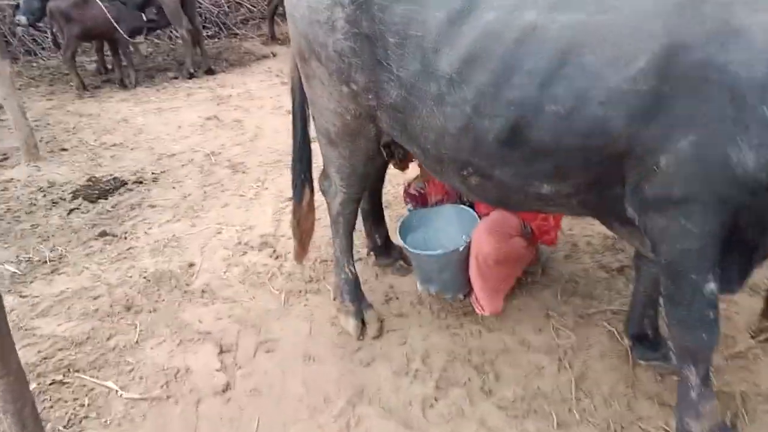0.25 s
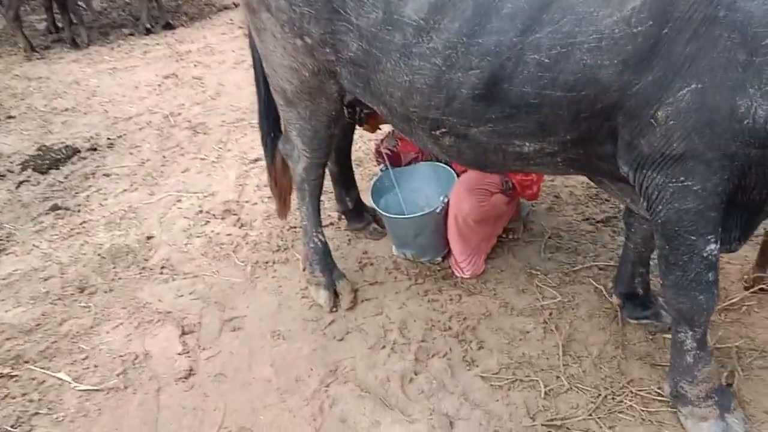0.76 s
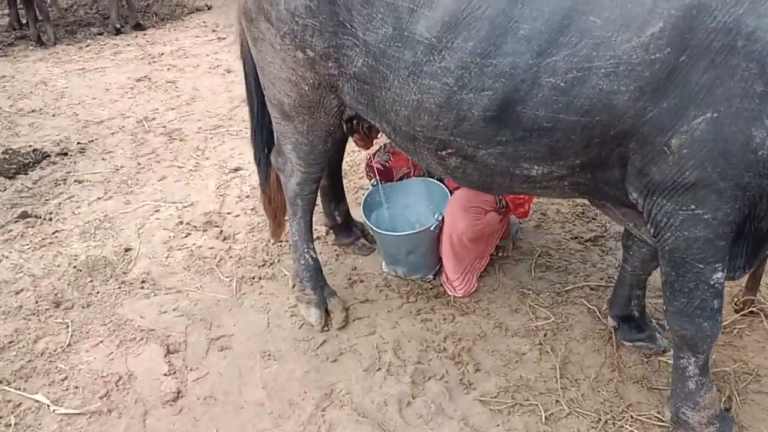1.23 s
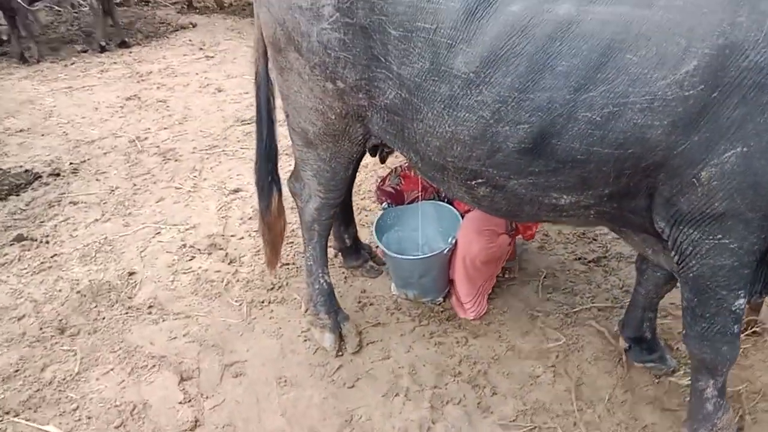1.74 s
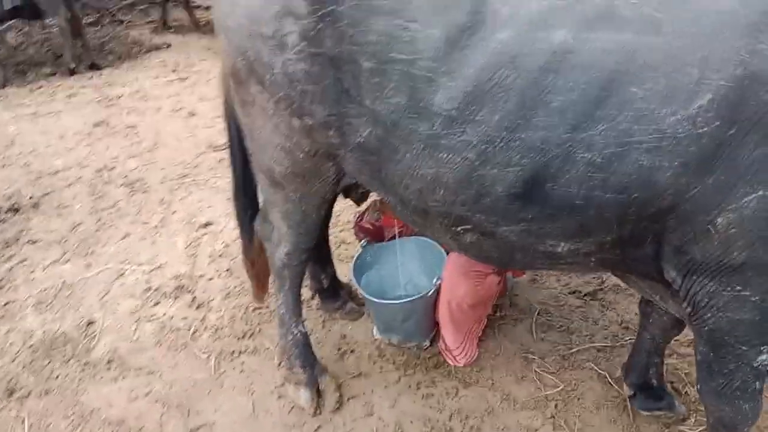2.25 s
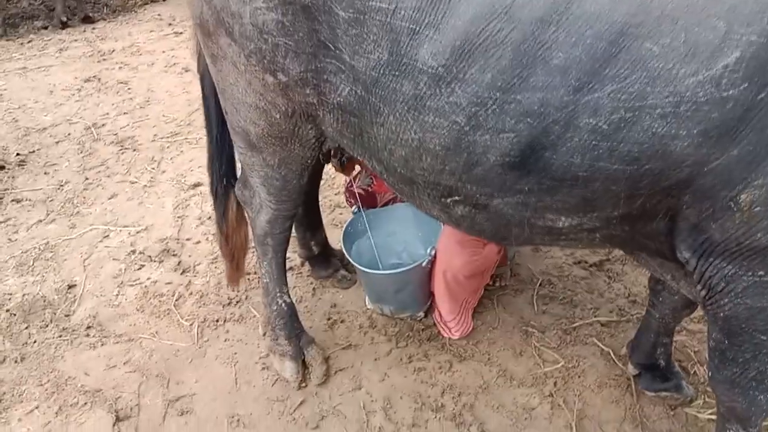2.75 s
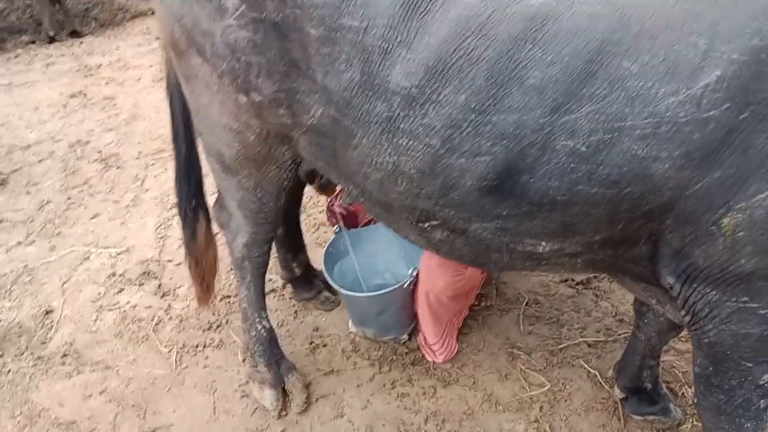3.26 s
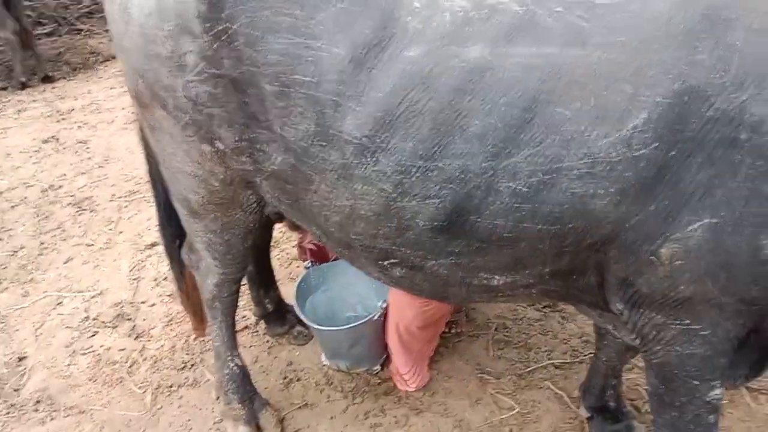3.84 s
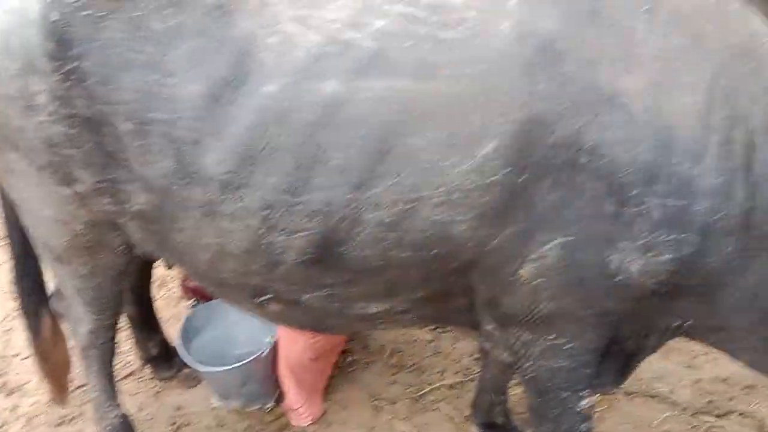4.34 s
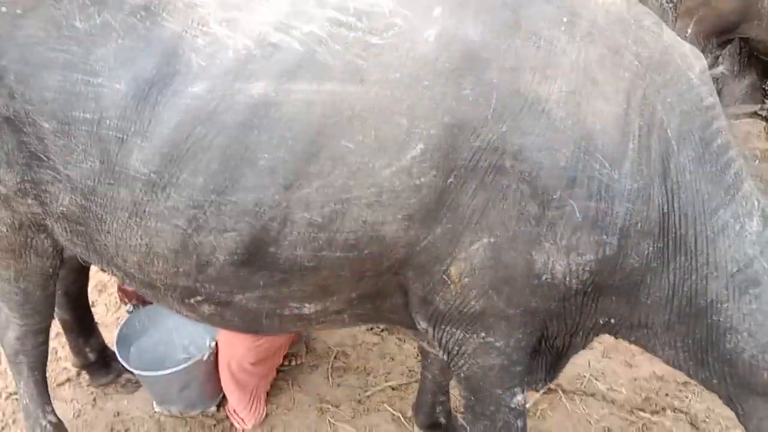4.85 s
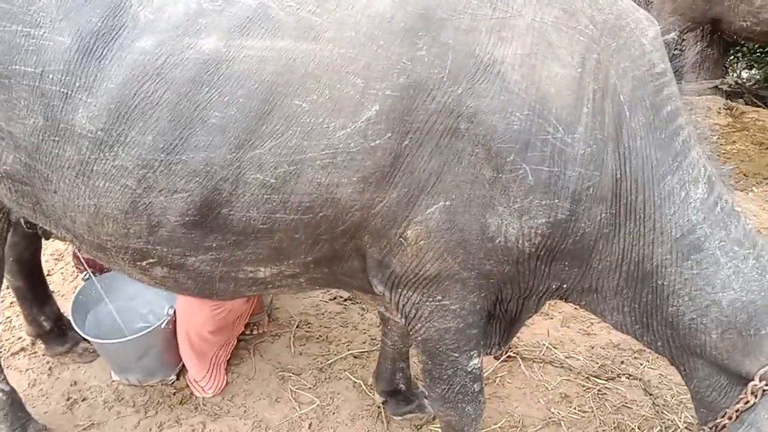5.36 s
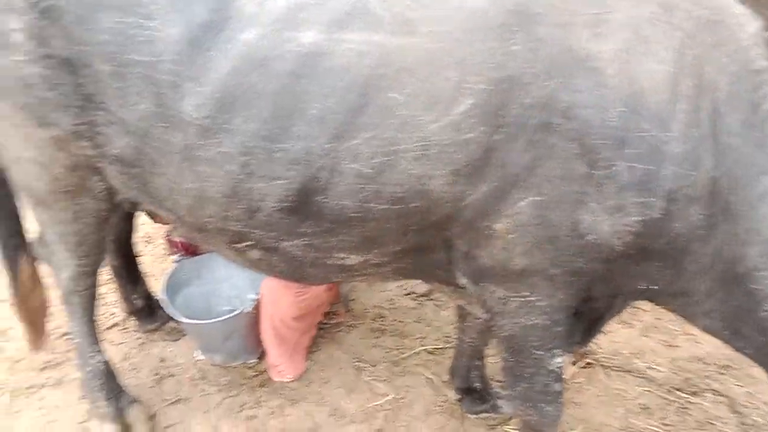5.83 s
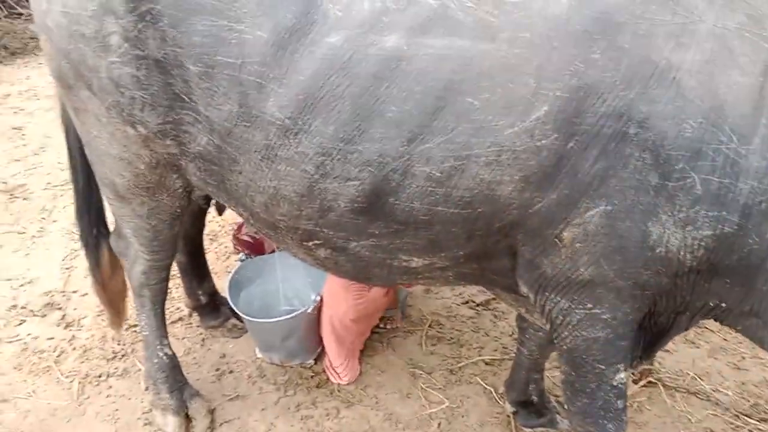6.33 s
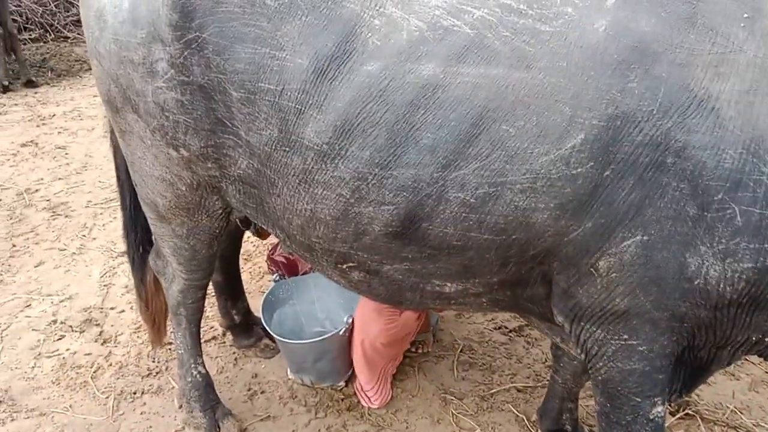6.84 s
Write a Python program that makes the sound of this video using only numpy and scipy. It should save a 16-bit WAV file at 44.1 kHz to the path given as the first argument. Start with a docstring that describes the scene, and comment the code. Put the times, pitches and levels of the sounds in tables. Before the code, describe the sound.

A buffalo is milked by hand outdoors: short wet squirts fizz and gurgle in a metal pail, sometimes pinging its wall, with soft thuds.

```python
"""Jets of milk hiss into the froth of a steel bucket, about three a second, as a buffalo is milked by hand outdoors.
One microphone moves slowly round the animal: noise shaped by each squeeze makes splash and fizz, while decaying
chirps make bubbles and a resonance that falls in pitch is the pit each jet digs.
Drops spatter, noise bursts and ringing modes are blows on the bare wall, and low tones thud in the dirt yard.
Faint outdoor air and the hiss of settling froth, both from one coloured noise, lie behind it all."""
import sys
import numpy as np
from scipy import signal
from scipy.io import wavfile
from scipy.ndimage import uniform_filter1d

SR = 44100
rng = np.random.default_rng(int(sys.argv[2]) if len(sys.argv) > 2 else 0)


def write(x):
    x = np.atleast_2d(x).T
    wavfile.write(sys.argv[1], SR, np.round(np.clip(x, -1, 1) * 32767).astype(np.int16))


N = 312669


def gain_of(db):
    """Decibels to amplitude."""
    return 10 ** (np.asarray(db) / 20)


def evened(x):
    """Scales to an rms of one."""
    return x / np.sqrt(np.mean(x ** 2) + 1e-20)


def steadied(x, size=1500):
    """Holds the running rms near one and keeps the fine grain; size is in samples."""
    power = uniform_filter1d(uniform_filter1d(x ** 2, size), size)
    return x / np.sqrt(power + 1e-12)


def add(mix, s, sound):
    """Mixes a sound in at time s."""
    part = mix[max(round(s * SR), 0):][:len(sound)]
    part += sound[:len(part)]


def coloured(x, points):
    """Causal minimum-phase filter with the given spectrum."""
    hz, db = np.transpose(points)
    bin_hz = abs(np.fft.fftfreq(4096, 1 / SR)) + 1
    log_gain = np.log(gain_of(np.interp(np.log(bin_hz), np.log(hz), db)))
    taps = np.fft.ifft(np.exp(np.conj(signal.hilbert(log_gain)))).real[:2048]
    return signal.oaconvolve(x, taps)[:len(x)]


def high_pass(x, hz, order=4):
    """Weakens what lies below hz."""
    return signal.sosfilt(signal.butter(order, hz, "high", fs=SR, output="sos"), x)


def resonate(x, hz, width):
    """A resonance of gain one that can follow a pitch curve: shift to 0 Hz, smooth, shift back."""
    turn = np.exp(2j * np.pi * np.cumsum(hz * np.ones(len(x))) / SR)
    r = np.exp(-np.pi * width / SR)
    smooth = signal.lfilter([(1 - r) ** 2], [1, -2 * r, r * r], x / turn)
    return 2 * (turn * smooth).real


def churned(x, patchy_db, size=1024):
    """Lifts and lowers changing patches of the spectrum; a smaller size makes them quicker and wider."""
    z = signal.stft(x, SR, nperseg=size, noverlap=size * 3 // 4)[2]
    patches = uniform_filter1d(rng.standard_normal(z.shape), size=4, axis=0)
    patches = evened(uniform_filter1d(patches, size=8, axis=1))
    return signal.istft(z * gain_of(patchy_db * patches), SR, nperseg=size, noverlap=size * 3 // 4)[1][:N]


# Colour of the background: faint outdoor air and the hiss of settling froth.
# Each row: frequency in Hz, level in dB per Hz.
BACKGROUND_COLOUR = [(25, -59), (60, -2.5), (130, 2), (300, -1.5), (450, -1.5), (650, 4.5), (900, 25.5),
                     (1500, -23.5), (2400, -15), (3200, 2), (4400, 11), (5300, 20.5), (7500, 0), (9300, -7),
                     (15500, -4)]


def background():
    """Faint outdoor air and the hiss of settling froth: noise whose spectrum changes in patches."""
    hiss = coloured(churned(rng.standard_normal(N), patchy_db=2.5), BACKGROUND_COLOUR)
    return gain_of(-58.5) * evened(hiss)


# Dull thuds in the yard and the bucket.
# Each row: start in seconds, level in dB, pitch in Hz, time to die by 60 dB in seconds.
THUD_EVENTS = [(2.163, -56, 78, 0.075), (2.888, -49.5, 138, 0.13), (3.157, -53, 170, 0.089),
               (3.182, -40.5, 213, 0.079), (3.217, -40, 124, 0.043), (3.398, -58, 230, 0.13),
               (3.439, -58, 125, .08), (3.54, -42, 245, 0.064), (3.6, -47, 208, 0.095),
               (3.679, -47, 267, 0.14), (3.709, -23.5, 136, 0.042), (3.727, -41.5, 187, 0.088),
               (3.774, -19, 382, 0.0076), (3.776, -37, 105, .07), (3.787, -50, 77, 0.19),
               (4.163, -55, 116, 0.13), (5.547, -35, 494, 0.077), (5.621, -53.5, 117, 0.16)]
THUD_RISE_SHARE = 0.088  # soft earth yields: the rise takes this share of a thud's dying time


def thuds():
    """Soft earth gives a low push that dies away, with a scuff of dirt."""
    out, t = np.zeros(N), np.arange(SR // 3) / SR
    for s, db, hz, t60 in THUD_EVENTS:
        band = signal.butter(2, [hz / 3, hz * 3.2], "band", fs=SR, output="sos")
        scuff = evened(signal.sosfilt(band, rng.standard_normal(len(t))))
        push = np.sin(2 * np.pi * hz * t)
        rise = np.minimum(t / (THUD_RISE_SHARE * t60), 1)
        add(out, s, rise * gain_of(db - 60 * t / t60) * (push + gain_of(-7.0) * scuff))
    return high_pass(out, hz=52)


# Modes of the steel bucket. Each row: frequency in Hz, level in dB, time to die by 60 dB in seconds.
BUCKET_MODES = [(630, -25, .3), (845, -19, .25), (919, -8, .22), (1085, -17, .3), (1233, -13, .24),
                (1610, -14, .19), (1863, -17.5, .21), (1965, -15, .19), (2331, -19, .25), (2390, -16, .11),
                (2686, -13, .24), (3020, -13, .19), (3150, -13, .23), (3554, 1, .14), (3880, -10, .07),
                (4064, -15, .1), (4200, -20, .14), (6342, -19, .12), (6982, -17, .1), (7187, -18, .09)]


def ring():
    """The bucket's answer to one tap: a sum of dying modes."""
    t = np.arange(SR // 4) / SR
    return sum(gain_of(db - 60 * t / t60) * np.sin(2 * np.pi * (hz * t + rng.random()))
               for hz, db, t60 in BUCKET_MODES)


def in_bucket(x, ring_db):
    """A sound plus the ringing that it stirs up; the jet wanders, so the modes come and go."""
    answer = ring()
    ringing = signal.oaconvolve(x, answer / np.linalg.norm(answer))[:N]
    return x + gain_of(ring_db) * churned(ringing, patchy_db=5)


# The jet plays on the bare wall and keeps its nearest modes ringing.
# Each row: start in seconds, length in seconds, favoured frequency in Hz, level in dB.
WALL_SPRAY_EVENTS = [(0.448, 0.094, 900, -52.5), (1.076, 0.14, 936, -43), (2.992, 0.0263, 960, -49),
                     (3.108, 0.092, 860, -44.5), (3.172, 0.015, 915, -35.5), (3.762, 0.087, 993, -41),
                     (4.349, 0.0077, 3420, -38), (4.342, 0.096, 644, -50.5), (4.733, 0.15, 1246, -44.5),
                     (5.563, 0.11, 863, -42.5), (5.944, 0.077, 947, -38.5), (5.946, 0.015, 3590, -31),
                     (5.947, 0.31, 1095, -48.5), (6.23, .013, 3580, -42), (6.302, 0.045, 1060, -65),
                     (6.353, 0.049, 990, -50)]


def wall_sprays():
    """A steady patter on bare steel drives a few of its modes, which ones depending on the spot."""
    out, answer = np.zeros(N), ring()
    for s, length, hz, db in WALL_SPRAY_EVENTS:
        n = round(length * SR)
        patter = resonate(rng.standard_normal(SR), hz, width=113)
        # skip the build-up, so that the modes already ring
        ringing = steadied(signal.oaconvolve(patter, answer))[len(answer):][:n]
        add(out, s, gain_of(db) * ringing * signal.windows.tukey(n, .3))
    return out


# The jet strikes the wall. Each row: start in seconds, level in dB before the trim in strikes(),
# treble in dB against the crack, time to die by 60 dB in seconds, wall ring in dB against the crack.
WALL_STRIKES = [(0.201, -37, 28, 0.055, -23), (0.743, -33.5, 12, .05, -18), (1.0819, -23, 6, 0.03, -5.5),
                (1.2515, -31, 13, 0.026, -23), (1.314, -25, -7, 0.026, -18), (1.719, -33, 14, 0.026, -22),
                (1.744, -20, -13, 0.066, -29), (1.757, -13, -12, 0.034, -25), (1.766, -13, -16, .03, -27),
                (1.805, -15, -17, 0.037, -30), (1.908, -27, 16, .025, -24), (2.055, -18.5, -5, 0.042, -17),
                (2.322, -38, 16, 0.026, -18), (2.362, -30, 14, .025, -22), (2.729, -29.5, 19, 0.021, -22),
                (2.766, -13.5, -9, 0.083, -27), (2.777, -19, 0, 0.091, -17), (2.8, -24, 16, 0.021, -17),
                (2.839, -25, 12, 0.023, -22), (2.89, -28, 15, 0.021, -28), (3.178, -29, 14, 0.028, -14),
                (3.243, -23.5, 8, 0.03, -13), (3.541, -17, -16, 0.038, -30), (3.673, -26, -1, 0.046, -7),
                (3.729, -10.5, -25, 0.031, -25), (4.218, -17, -20, 0.03, -16), (4.348, -19, -1, 0.046, -1),
                (4.446, -26, 6.5, 0.072, -21), (4.858, -18.5, 5.5, 0.02, -19),
                (5.1387, -18.5, -2, 0.086, -5), (5.5478, -9, 5, 0.054, 0), (5.703, -17, -26, 0.087, -9),
                (5.726, -17.5, -20, .06, -11), (5.9355, -11.5, -4, 0.075, -1.5),
                (6.231, -20, -12, 0.03, -31), (6.352, -27, -10, 0.044, -8), (6.3869, -16, -22, 0.061, -11),
                (6.4, -25, -11, 0.036, -16), (6.492, -20.5, -2, 0.031, -22), (6.59, -25.5, -5, .03, -25),
                (6.6885, -18, -4, 0.048, -21), (6.715, -35, 17, 0.022, -22), (6.997, -24, -23, 0.13, -7),
                (7.082, -21.5, -1, .04, -18)]
# Every jet ticks as it first breaks the surface: treble in dB, dying time in seconds, wall ring in dB.
FIRST_TOUCH = (6, 0.5, -24)


def blows():
    """Every sudden impact of the jet: its first touch in each squirt, and the strikes on the wall."""
    touches = [(start, tick_db, *FIRST_TOUCH)
               for start, *_, tick_db, fresh_hz, deep_hz, dig_s in SQUEEZES if start > 0]
    return touches + list(WALL_STRIKES)


def on_surface(dip_db, lead, width):
    """Gain of the jet in the milk: it leaves the surface around each blow on the wall (times in seconds)."""
    t = np.arange(N) / SR
    away = sum(np.exp(-((t - row[0] + lead) / width) ** 2) for row in WALL_STRIKES)
    return gain_of(-dip_db * away)


# Colour of a blow. Each row: frequency in Hz, level in dB per Hz.
CRACK_COLOUR = [(200, -37), (450, -40), (900, -3), (1500, -13.5), (2400, 0.5), (3600, 10.5), (4200, 5.5),
                (4900, -3), (6000, -2), (7000, 7), (8000, -3), (9300, -18.5), (15500, -17)]
SNAP_RISE_S = 0.00031  # the treble snaps at once
CRACK_RISE_S = 0.0013  # the head of the jet flattens before it hits with full force
RING_RISE_S = 0.0039  # the ringing takes a moment to spread round the wall
GRAZE_S_PER_DB, FULL_BLOW_DB = .0002, -15  # weaker blows only graze the wall and build up more slowly


def strikes():
    """A sudden blow of the jet: a bright snap, a rattling crack and the ring of the steel wall."""
    out, t = np.zeros(N), np.arange(SR // 4) / SR
    treble_filter = signal.butter(2, 5000, "high", fs=SR, output="sos")
    for s, db, treble_db, t60, ring_db in blows():
        rattle = steadied(coloured(rng.standard_normal(len(t)), CRACK_COLOUR), size=200)
        treble = signal.sosfiltfilt(treble_filter, rattle)
        graze_s = GRAZE_S_PER_DB * np.clip(FULL_BLOW_DB - db, 0, 10)
        decay = gain_of(-60 * t / t60)
        snap = treble * np.minimum(t / (SNAP_RISE_S + graze_s), 1) * gain_of(treble_db) * decay
        crack = (rattle - treble) * np.minimum(t / (CRACK_RISE_S + graze_s), 1) * decay
        wall = ring() * np.minimum(t / RING_RISE_S, 1) * gain_of(ring_db)
        add(out, s, gain_of(db - 11.0) * (snap + crack + wall))
    return high_pass(out, hz=557)


# Sliding resonances. Each row of the three tables: start in seconds, length in seconds,
# first pitch in Hz, last pitch in Hz, width in Hz, level in dB.
# Low gurgles in the milk, and at 5.543 s the low body of a blow on the bucket.
LOW_GLIDES = [(.02, 0.5, 190, 150, 90, -79), (.33, 0.073, 530, 430, 90, -63),
              (.39, 0.073, 413, 393, 50, -67), (.5, 0.085, 295, 255, 60, -74),
              (1.2, 0.05, 624, 560, 70, -68), (2.045, 0.038, 690, 650, 70, -54),
              (2.2, 0.067, 635, 596, 70, -56), (2.76, 0.14, 355, 302, 60, -62),
              (3.16, .11, 326, 250, 120, -62), (3.42, 0.05, 673, 620, 69.6, -55),
              (5.543, 0.028, 494, 420, 150, -36.5), (5.565, 0.064, 302, 201, 110, -61),
              (6.11, 0.092, 484, 450, 90, -51), (6.39, 0.26, 490, 453, 130, -62),
              (6.96, 0.2, 680, 666, 110, -52.5)]
# Thin, mostly rising whistles as the pit closes between squirts.
WHISTLE_GLIDES = [(0.313, 0.085, 5030, 5500, 500, -54), (0.695, 0.036, 2350, 2480, 120, -60),
                  (0.985, 0.053, 5100, 6150, 300, -51.5), (1.588, 0.14, 5150, 5600, 500, -56),
                  (1.59, .13, 2160, 2260, 140, -73), (1.655, .035, 11500, 11800, 400, -52),
                  (2.34, .025, 11600, 11900, 400, -49.5), (2.9, 0.14, 2350, 3000, 140, -67),
                  (2.91, 0.054, 5000, 5500, 400, -54), (2.925, .04, 11900, 10900, 700, -50),
                  (3.576, 0.13, 5070, 5700, 500, -55), (4.595, 0.091, 2620, 3300, 170, -55),
                  (5.595, 0.094, 3580, 5150, 300, -48), (5.85, 0.11, 2700, 3280, 220, -50),
                  (6.24, 0.125, 2320, 3120, 140, -72), (6.585, 0.083, 2270, 2420, 110, -73)]
# The jet digs in cleanly and the pit sings, mostly falling as it deepens.
SWOOP_GLIDES = [(.085, 0.14, 2350, 2160, 380, -42.5), (.135, 0.082, 2080, 1070, 470, -44.5),
                (.128, 0.099, 1070, 970, 146, -42.5), (.175, 0.073, 1290, 1230, 140, -42.5),
                (.46, 0.096, 3920, 4150, 250, -45), (.6, 0.042, 1280, 1220, 130, -47),
                (.815, 0.044, 1100, 1340, 130, -47), (.925, 0.047, 1840, 1920, 200, -47.5),
                (1.19, 0.073, 910, 780, 80, -43), (1.445, 0.063, 1370, 1270, 110, -37),
                (1.79, 0.074, 934, 1020, 110, -40.5), (1.9, 0.088, 1500, 1310, 297, -43.5),
                (2.095, 0.063, 2200, 2080, 200, -39.5), (2.115, 0.059, 3960, 4170, 250, -40),
                (3.065, 0.058, 2370, 2000, 220, -43), (3.37, 0.071, 1680, 1300, 415, -44),
                (4.04, 0.098, 1910, 1400, 330, -44), (4.69, 0.11, 1216, 1170, 169, -37.5),
                (5.335, 0.13, 2070, 1430, 400, -46), (5.73, 0.057, 950, 800, 60, -45.5),
                (5.797, 0.029, 850, 814, 50, -38), (6.0, 0.13, 2000, 1480, 180, -47.5),
                (6.67, .09, 1880, 1780, 220, -48.5)]


def glides(rows):
    """Noise sounds a resonance that slides from one pitch to another."""
    out = np.zeros(N)
    for s, length, first_hz, last_hz, width_hz, db in rows:
        n = round(length * SR)
        tone = resonate(rng.standard_normal(SR)[:n], np.geomspace(first_hz, last_hz, n), width_hz)
        tone = steadied(high_pass(tone, hz=0.85 * min(first_hz, last_hz)), size=900)
        add(out, s, gain_of(db) * tone * signal.windows.tukey(n, .7))
    return out


# The colour drifts as the listener walks round the animal. Each row: time in seconds, centre of the hollow
# in Hz, its depth in dB (negative for a hump), level of the top treble in dB.
COLOUR_DRIFT = [(0, 3120, -1, -2), (1.1, 3040, 2, 0), (1.6, 2040, -5.5, -3), (2.5, 3580, 3.5, -4.5),
                (3.4, 5400, -1, 3), (4.1, 5840, 6, 1.5), (5.2, 6700, 0, 4), (6.1, 6300, -0.5, 6.5),
                (7.1, 5040, 5.5, 4)]


def drifting(x, hollow_octaves, top_hz):
    """A hollow slides through the sound of the milk and its top treble changes as the listener moves."""
    hz, t, z = signal.stft(x, SR, nperseg=512, noverlap=384)
    s, *columns = np.transpose(COLOUR_DRIFT)
    hollow_hz, depth_db, top_db = (np.interp(t, s, column) for column in columns)
    hz = hz[:, None] + 1
    treble_db = top_db / (1 + (top_hz / hz) ** 16)
    hollow_db = depth_db * np.exp(-(np.log2(hz / hollow_hz) / hollow_octaves) ** 2)
    return signal.istft(z * gain_of(treble_db - hollow_db), SR, nperseg=512, noverlap=384)[1][:N]


# Spray and background turn hollow in one band for a moment, often as a jet breaks off.
# Each row: middle in seconds, half length in seconds, centre in Hz, half width in octaves, depth in dB.
BAND_LULLS = [(0.372, 0.033, 2700, 0.81, 11), (0.698, 0.082, 3020, 0.39, 9), (1.01, 0.033, 2600, 0.7, 10),
              (1.65, 0.028, 3150, 0.27, 15), (2.318, 0.028, 2580, 0.25, 17), (2.654, 0.016, 2800, 0.51, 8),
              (2.96, 0.038, 3300, .3, 20), (3.303, 0.024, 3260, 0.58, 23), (3.613, 0.033, 3080, 1.2, 12),
              (4.61, 0.078, 4400, 0.47, 6), (4.689, 0.021, 1720, .5, 19), (6.292, 0.032, 4900, 0.4, 17),
              (6.64, .03, 4350, 0.32, 18), (6.945, 0.027, 4660, 0.19, 8), (0.79, 0.074, 2830, 0.12, 19),
              (1.1, 0.18, 2840, 0.096, 7), (1.828, 0.11, 1870, 0.16, 19), (2.9, 0.039, 2560, .12, 18),
              (3.032, 0.079, 1780, 0.64, 18), (5.076, 0.03, 1550, 0.7, 12), (5.26, 0.051, 2670, 0.67, 9),
              (6.984, 0.053, 1260, .35, 9), (1.34, 0.016, 3000, 2, 13), (1.613, 0.038, 1400, 0.47, 13),
              (5.27, 0.049, 1310, 0.4, 6), (5.613, 0.026, 5900, 0.36, 9), (6.29, 0.033, 900, 0.68, 19),
              (6.285, 0.019, 10000, .8, 10)]


def lulled(x):
    """Brief hollows open in spray and background, each in its own band."""
    hz, t, z = signal.stft(x, SR, nperseg=512, noverlap=384)
    hz = hz[:, None] + 1
    db = sum(depth_db * np.exp(-((t - s) / half_s) ** 2 - (np.log2(hz / centre_hz) / octaves) ** 2)
             for s, half_s, centre_hz, octaves, depth_db in BAND_LULLS)
    return signal.istft(z * gain_of(-db), SR, nperseg=512, noverlap=384)[1][:N]


# The hand on the teat. Each row: start in seconds, length in seconds, hardest press in seconds after the start,
# unevenness of the press (1 = usual), slowness of the opening (1 = usual), then, before the trims of the mix,
# splash, big bubbles, small bubbles, fizz and first tick in dB, then pitch of the fresh pit in Hz,
# pitch of the deep pit in Hz, digging time in seconds.
SQUEEZES = [(-0.24, 0.26, 0.13, 1.02, 1.0, -41, -34.5, -37.5, -38.5, -57, 600.0, 590, 0.072),
            (0.069, 0.28, 0.13, 1.23, 1.72, -40, -37, -46, -34.5, -53, 2350, 670, 0.1),
            (0.382, 0.26, 0.15, 0.82, 0.86, -41.5, -42, -53, -41, -54, 1085, 567, 0.21),
            (0.724, 0.24, 0.15, 0.98, 1.07, -39.5, -38, -48, -38.5, -39.5, 910, 760, 0.061),
            (1.036, 0.28, 0.21, 1.18, 0.74, -39, -38, -46.5, -36.5, -43, 920, 640, 0.15),
            (1.357, 0.28, 0.12, 1.72, 1.06, -38, -38, -44, -33, -57, 855, 690, 0.041),
            (1.675, 0.31, 0.21, 1.4, 0.77, -45, -41, -42, -41.5, -50, 1080, 793, 0.037),
            (2.004, 0.27, 0.12, 0.96, 1.06, -39, -39.5, -39, -33, -46, 750, 634, 0.3),
            (2.307, 0.32, 0.15, 0.89, 2.2, -34.5, -37, -38.5, -34, -47, 1020, 766, 0.12),
            (2.674, 0.24, 0.1, 0.93, 1.26, -34.5, -31.5, -37.5, -29.5, -48, 940, 558, 0.054),
            (2.987, 0.29, 0.15, 1.09, 0.81, -36.5, -37, -39, -38.5, -36.5, 980, 563, 0.15),
            (3.329, 0.28, 0.028, 1.03, 1.38, -34, -35.5, -34.5, -34.5, -37, 1030, 667, 0.014),
            (3.632, 0.3, 0.15, 0.68, 1.66, -37, -37.5, -42, -42, -48, 970, 687, 0.13),
            (4.003, 0.27, 0.19, 0.84, 0.91, -38, -36.5, -39, -42, -36, 1160, 626, 0.038),
            (4.294, 0.29, 0.029, 0.57, 1.57, -35.5, -35.5, -40.5, -41.5, -51, 620, 483, 0.2),
            (4.649, 0.26, 0.066, 0.48, 1.85, -37, -36, -37, -40, -51, 1150, 530, 0.19),
            (4.974, 0.28, 0.16, 1.24, 1.84, -37, -36.5, -46, -47, -64, 1070, 523, 0.17),
            (5.32, 0.31, 0.2, 0.6, 1.18, -38, -37.5, -39, -43, -48, 1790, 560, 0.077),
            (5.642, 0.48, 0.077, 0.89, 0.99, -38.5, -35.5, -47.5, -45, -48, 980, 484, 0.16),
            (5.919, 0.32, 0.2, 1.09, 2.6, -37, -37.5, -41.5, -45, -44, 860, 472, 0.2),
            (6.313, 0.27, 0.04, 0.57, 1.25, -39.5, -40, -49.5, -45.5, -60, 720, 490, 0.069),
            (6.647, 0.25, 0.15, 1.92, 0.53, -40.5, -39, -50, -42, -49, 1080, 490, 0.21),
            (6.967, 0.26, 0.17, 1.85, 0.66, -35, -32.5, -66, -43, -53, 670, 620, 0.075)]
REFILL_S = 0.037  # the pit closes between squirts, so its pitch moves smoothly back
OPENING_S = 0.01  # the teat takes a moment to open
RUN_DRY_DB_PER_S2 = 700  # once the grip is released the jet dies ever faster


def pit_pitch(t):
    """Each jet digs a fresh pit, whose pitch slides as it deepens, mostly down, and then settles."""
    start, *_, fresh_hz, deep_hz, dig_s = np.transpose(SQUEEZES)
    k = np.maximum(np.searchsorted(start, t + REFILL_S / 2) - 1, 0)  # the squirt of the moment
    shallow = np.exp(-(np.maximum(t - start[k], 0) / dig_s[k]) ** 4)
    octaves = np.log2(deep_hz[k]) + shallow * np.log2(fresh_hz[k] / deep_hz[k])
    return 2 ** uniform_filter1d(octaves, max(round(REFILL_S / (t[1] - t[0])), 1))


def squeezed(levels_db, shape):
    """Gain over all squirts: it opens, swells to the hardest press, sags as the teat empties, dies on release."""
    first_db, attack_s, lag_s, swell, sag, release = shape
    out, t = np.zeros(N), np.arange(N) / SR
    for (start, length, press_s, uneven, slow, *_), level_db in zip(SQUEEZES, levels_db):
        during = (t >= start) & (t < start + 2 * length)
        age = t[during] - start
        past = age - press_s - lag_s  # seconds past the hardest press
        released = np.maximum(age - length, 0)
        db = level_db - uneven * np.maximum(-swell * past, sag * past)
        db -= first_db * np.maximum(1 - age / (slow * attack_s), 0)
        db -= release * released + RUN_DRY_DB_PER_S2 * released ** 2
        out[during] += (gain_of(db) * np.minimum(age / OPENING_S, 1)) ** 2  # powers add
    return np.sqrt(out)


# The fingers push out an extra spurt. Each row: middle in seconds, half length in seconds, boost in dB.
EXTRA_SPURTS = [(0.97, 0.038, 3.5), (1.756, 0.059, 15.5), (1.94, 0.062, 9.5), (2.245, 0.0078, 3),
                (3.547, 0.036, 7), (4.931, 0.017, 5), (5.725, 0.029, 3), (5.826, 0.0071, 4.5),
                (6.483, .013, 6.5), (1.18, 0.0099, 3)]
# How each sound follows a squeeze. Each holds: quieter at first in dB, attack in seconds, lag behind the press
# in seconds, swell in dB/s, sag in dB/s, release in dB/s.
SPLASH_FOLLOW = (21.3, 0.046, 0.0095, 17, 84.3, 120)
BIG_FOLLOW = (18.6, 0.037, 0.0038, 66, 50.6, 380)
SMALL_FOLLOW = (16, 0.032, 0.005, 62, 87, 230)
FIZZ_FOLLOW = (10.1, 0.066, 0.0081, 11.6, 70.5, 190)


def jet():
    """The squirts as gain curves: splash, big bubbles, small bubbles, fizz."""
    t = np.arange(N) / SR
    boost = gain_of(sum(db * np.exp(-((t - s) / half_s) ** 2) for s, half_s, db in EXTRA_SPURTS))
    levels = np.transpose(SQUEEZES)[5:9]
    shapes = [SPLASH_FOLLOW, BIG_FOLLOW, SMALL_FOLLOW, FIZZ_FOLLOW]
    return [boost * squeezed(db, shape) for db, shape in zip(levels, shapes)]


def through_pit(x, peak_db, octaves, cutoff, overtone_db):
    """The pit acts like a stopped pipe at its pitch and three times that (negative dB hollows); lows are cut."""
    hz, t, z = signal.stft(x, SR, nperseg=1024, noverlap=512)
    ratio = (hz[:, None] + 1) / pit_pitch(t)
    edge = 1 / (1 + (cutoff / ratio) ** 14)
    bump_db = peak_db * np.exp(-(np.log2(ratio) / octaves) ** 2)
    bump_db += overtone_db * np.exp(-(np.log2(ratio / 3) / octaves) ** 2)
    return signal.istft(z * edge * gain_of(bump_db), SR, nperseg=1024, noverlap=512)[1][:N]


def froth(slow_db, quick_db):
    """Wet hiss: slow patches of colour with quick splashy clumps inside them."""
    return churned(churned(rng.standard_normal(N), slow_db), quick_db, size=512)


def spatter(per_s, spread_db, t60):
    """Amplitude of the broken-up jet: each drop lands at once and dies away between the walls."""
    landed = rng.random(N) < per_s / SR
    sizes = gain_of(spread_db * np.minimum(rng.exponential(1, N), 4.5)) * landed
    t = np.arange(SR // 8) / SR
    power = signal.oaconvolve(sizes ** 2, gain_of(-60 * t / t60) ** 2)[:N]
    return steadied(np.sqrt(abs(power)))


# Colour of single droplets. Each row: frequency in Hz, level in dB per Hz.
DROP_COLOUR = [(250, -63), (700, -22), (1500, -21), (2500, -9), (4000, 10), (5500, 5), (7200, -7),
               (8300, 10.5), (9400, -8.5), (12000, -31), (15600, -28)]


def droplets(per_s, spread_db, t60):
    """Single drops tick on the froth and the wall, sharing twelve patterns of echoes in the bucket."""
    t, out = np.arange(SR // 25) / SR, np.zeros(N)
    for _ in range(12):
        landed = rng.random(N) < per_s / 12 / SR
        sizes = gain_of(spread_db * np.minimum(rng.exponential(1, N), 3.5)) * landed
        echoes = rng.standard_normal(len(t)) ** 3 * gain_of(-60 * t / t60)  # cubing leaves a few strong ones
        out += signal.oaconvolve(sizes, evened(echoes))[:N]
    return evened(coloured(out, DROP_COLOUR))


def bubbles(centre_hz, per_s, octaves, cycles, spread_db, rise):
    """Bubbles pinch off at random around a pitch; each rings for some cycles and chirps upward."""
    at = np.flatnonzero(rng.random(N) < per_s / SR)
    pitch, size = rng.standard_normal(len(at)), rng.exponential(1, len(at))
    hz = np.minimum(centre_hz * 2 ** (octaves * np.clip(pitch, -2, 2)), SR / 3)
    n = np.arange(800)  # samples that each bubble lasts
    turns = hz[:, None] * n / SR
    age = turns / cycles
    waves = np.exp(-age) * np.sin(2 * np.pi * turns * (1 + rise * np.minimum(age, 4)))
    waves *= gain_of(spread_db * np.minimum(size, 4))[:, None]
    return np.bincount((at[:, None] + n).ravel(), waves.ravel(), N)[:N]


# Colours of the splash, the fizz and the air in the bucket. Each row: frequency in Hz, level in dB per Hz
# (for the air, gain in dB).
SPLASH_COLOUR = [(600, -41), (1100, -39), (1500, -13), (2000, -11.5), (2350, 2), (2850, -2.5), (3400, 0),
                 (3950, 3.5), (4400, -3.5), (5200, -2.5), (6200, -11.5), (9000, -30)]
FIZZ_COLOUR = [(2500, -43.5), (4500, 1), (5600, -4), (6200, 2), (6900, 4.5), (7700, 4), (8500, -10.5),
               (9400, -17.5), (10200, -8.5), (12500, -9), (13800, -11.5), (15600, -12.5)]
AIR_COLOUR = [(300, -9), (480, -7.5), (650, -7.5), (800, 1.5), (910, 5.5), (1020, 8.5), (1130, 3.5),
              (1250, 10), (1400, 4), (1900, -22.5), (4000, -57.5)]
# Narrow high tones that flicker with the fizz. Each row: frequency in Hz, width in Hz.
HIGH_TONES = [(10600, 39), (11000, 90), (11780, 73)]


def milk():
    """The jet splashes on the surface, fizzes in the froth and bubbles in the pit that it digs."""
    splash_gain, big_gain, small_gain, fizz_gain = jet()
    drops = spatter(per_s=740, spread_db=-1.0, t60=0.057)
    # the finest spray partly goes its own way
    mist = 0.39 * drops + spatter(per_s=800, spread_db=5.0, t60=0.054)

    splash = coloured(drops * froth(slow_db=4.0, quick_db=3.0), SPLASH_COLOUR)
    splash = steadied(through_pit(splash, peak_db=12.5, octaves=0.38, cutoff=.7, overtone_db=3.0))
    fizz = steadied(coloured(mist * froth(slow_db=3.2, quick_db=1.5), FIZZ_COLOUR))
    flicker = evened(sum(resonate(rng.standard_normal(N), hz, width) * spatter(per_s=6.2, spread_db=-6, t60=0.04)
                         for hz, width in HIGH_TONES))
    ticks = droplets(per_s=260, spread_db=4.5, t60=.025) * np.minimum(splash_gain, fizz_gain)

    # clouds of bubbles; the big and small ones are cut off below the pitch of the pit
    big = coloured(bubbles(800, per_s=520, octaves=0.494, cycles=11, spread_db=2.5, rise=0.01), AIR_COLOUR)
    big = churned(big, patchy_db=3.5)
    big = steadied(through_pit(big, peak_db=6.0, octaves=0.26, cutoff=.86, overtone_db=-10))
    small = bubbles(1650, per_s=740, octaves=0.2504, cycles=13.6, spread_db=-0.5, rise=0.011)
    small = churned(small, patchy_db=4.5)
    small = steadied(through_pit(small, peak_db=-6, octaves=0.11, cutoff=.9, overtone_db=-3.0))
    tiny = evened(bubbles(3000, per_s=170, octaves=.33, cycles=24, spread_db=2.5, rise=.016))

    surface = gain_of(-0.73) * splash * splash_gain + gain_of(-9) * ticks
    surface += (gain_of(-4.0) * fizz + gain_of(-21.5) * flicker) * fizz_gain
    bubbling = gain_of(-5.0) * big * big_gain + gain_of(-4.5) * small * small_gain
    bubbling += gain_of(-13) * tiny * splash_gain
    landing = on_surface(dip_db=5, lead=.006, width=.016)
    return in_bucket((surface + bubbling) * landing, ring_db=-24.0)


def scene():
    """Everything heard while walking slowly round the animal, on one channel."""
    wash = lulled(drifting(milk(), hollow_octaves=0.23, top_hz=7070) + background())
    sliding = glides(SWOOP_GLIDES) + glides(WHISTLE_GLIDES) + glides(LOW_GLIDES)
    return (wash + sliding + wall_sprays() + strikes() + thuds())[None]


def record(dry):
    """The recorder's band limit: a low-pass at 15850 Hz."""
    taps = signal.firwin(511, 15850, window=("kaiser", 9), fs=SR)
    return signal.oaconvolve(dry, taps[None], "same")


dry = scene()
out = record(dry)
write(out)
```